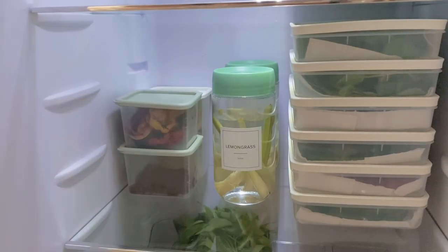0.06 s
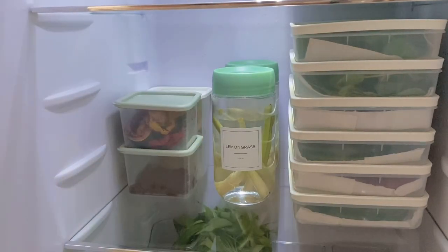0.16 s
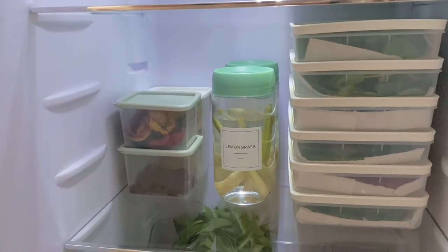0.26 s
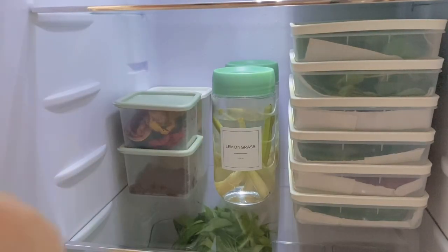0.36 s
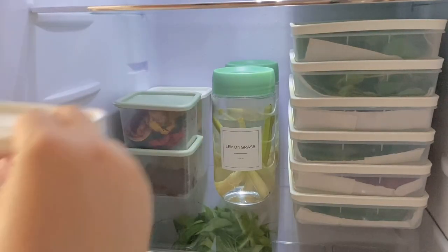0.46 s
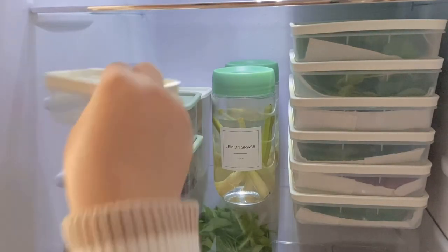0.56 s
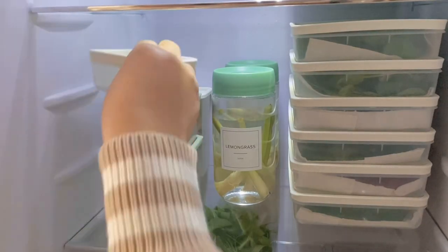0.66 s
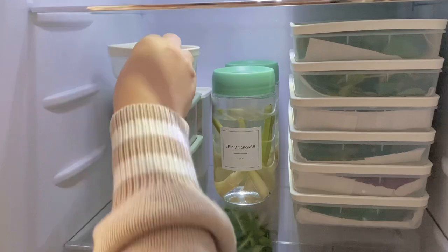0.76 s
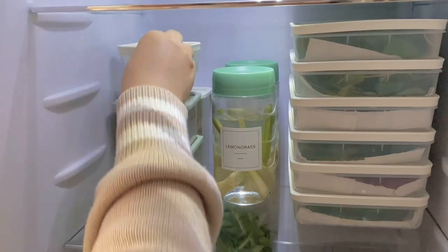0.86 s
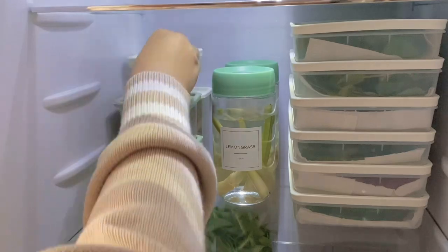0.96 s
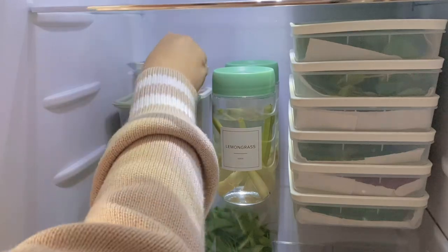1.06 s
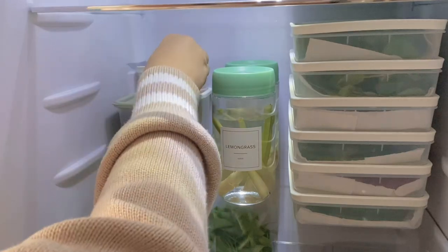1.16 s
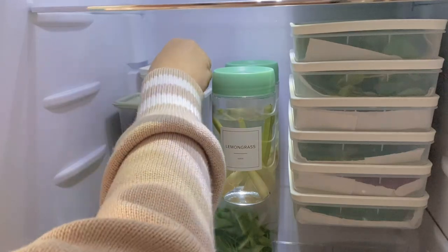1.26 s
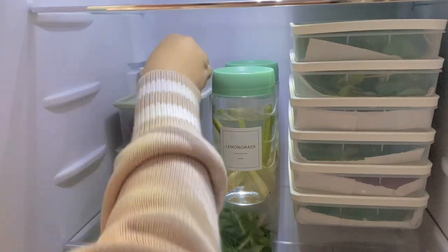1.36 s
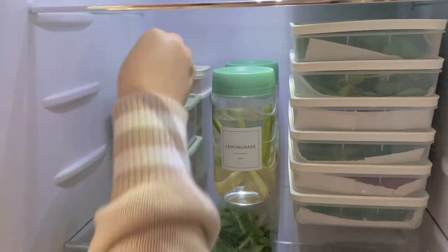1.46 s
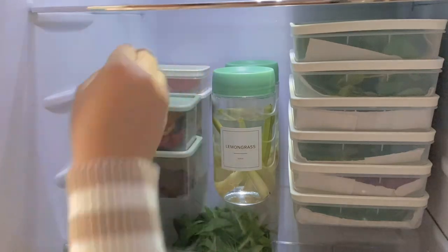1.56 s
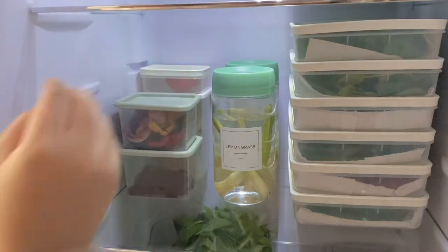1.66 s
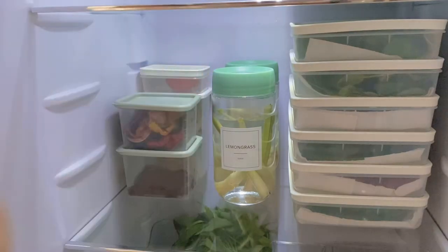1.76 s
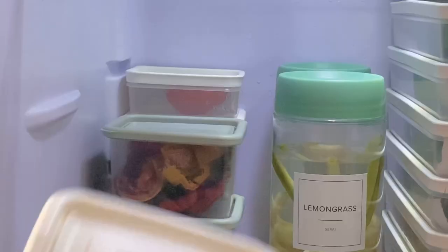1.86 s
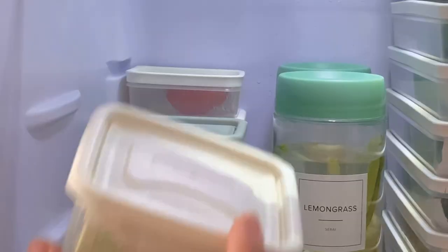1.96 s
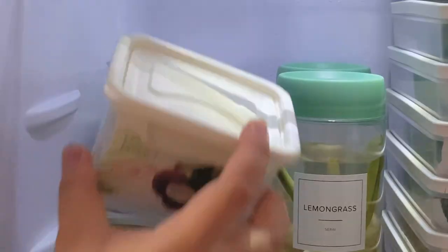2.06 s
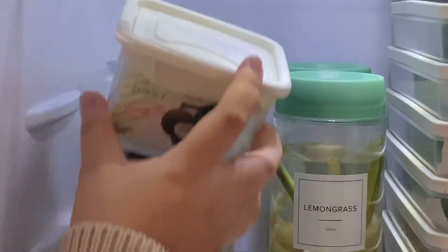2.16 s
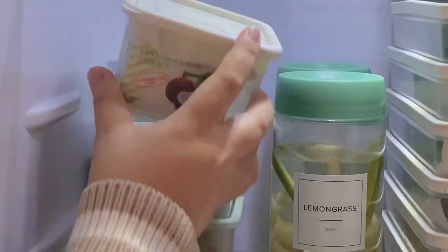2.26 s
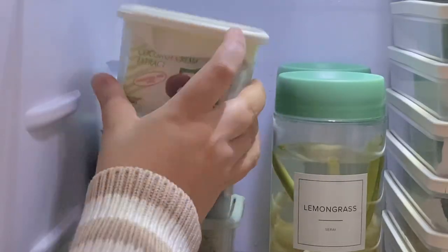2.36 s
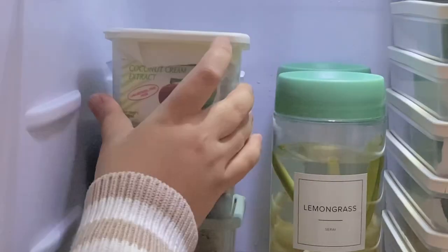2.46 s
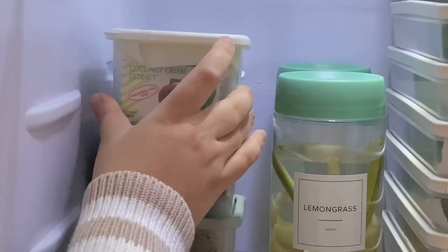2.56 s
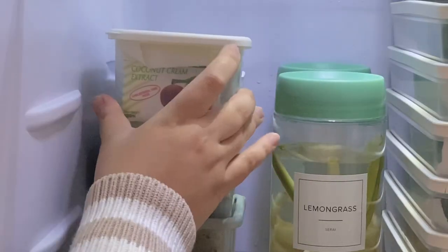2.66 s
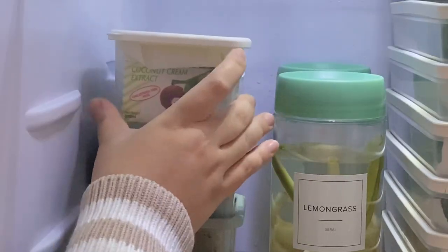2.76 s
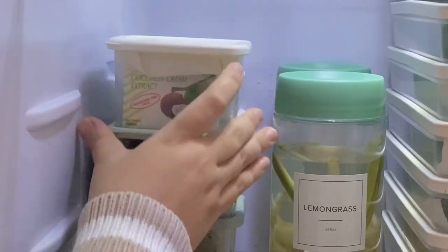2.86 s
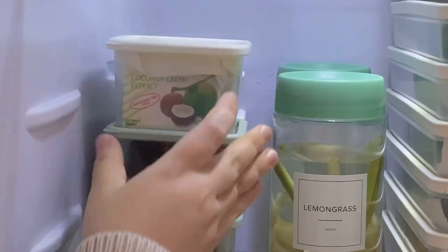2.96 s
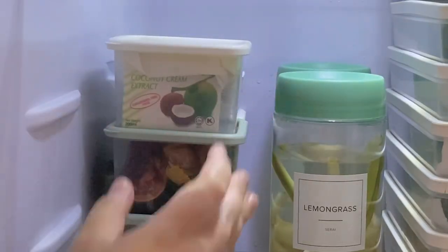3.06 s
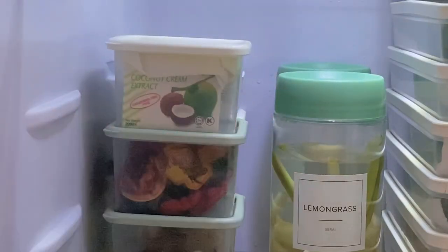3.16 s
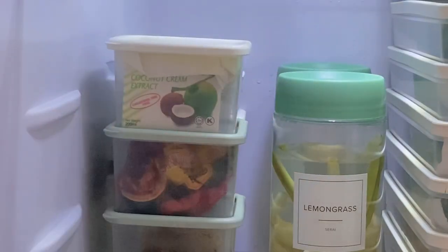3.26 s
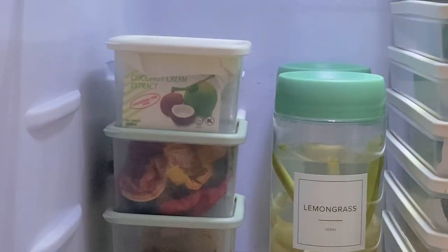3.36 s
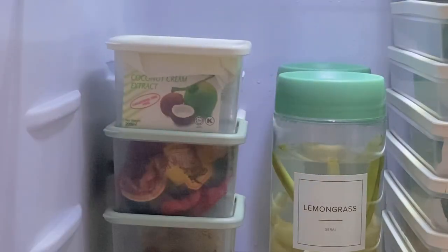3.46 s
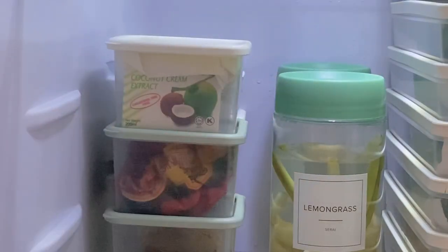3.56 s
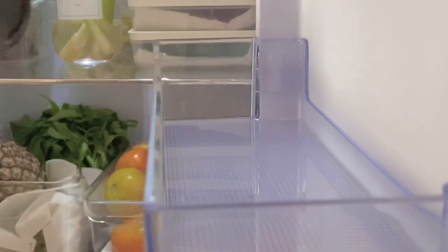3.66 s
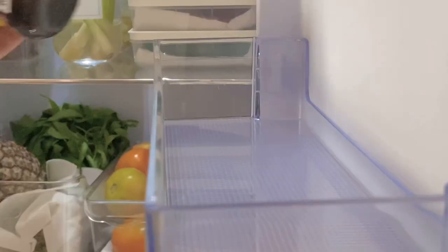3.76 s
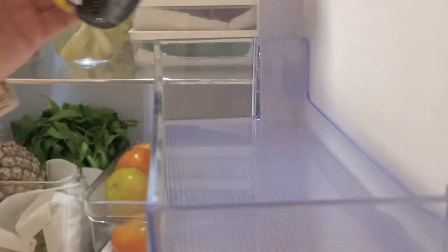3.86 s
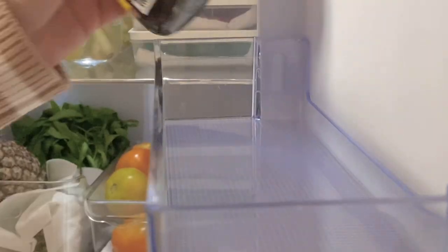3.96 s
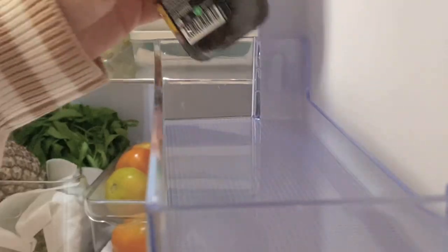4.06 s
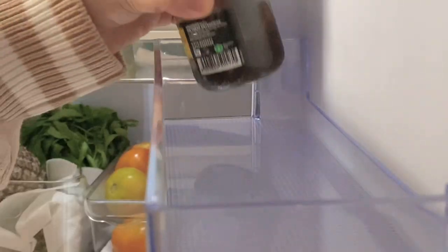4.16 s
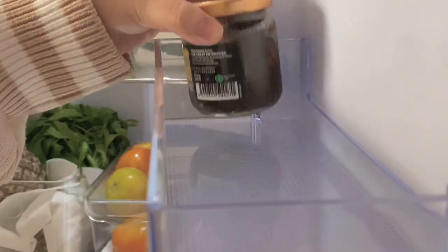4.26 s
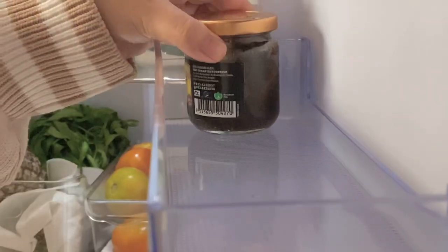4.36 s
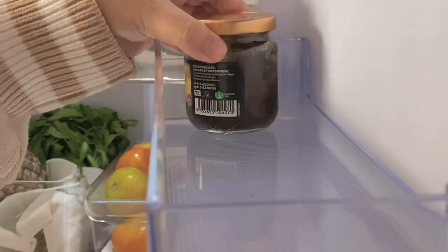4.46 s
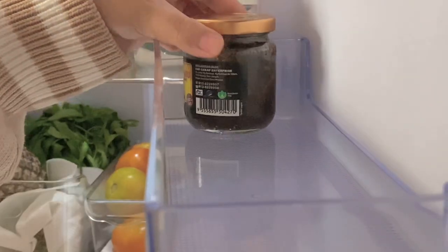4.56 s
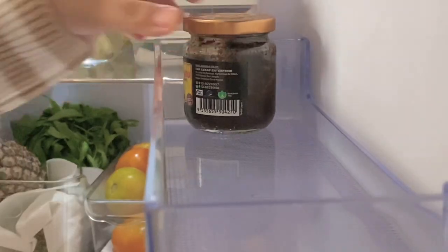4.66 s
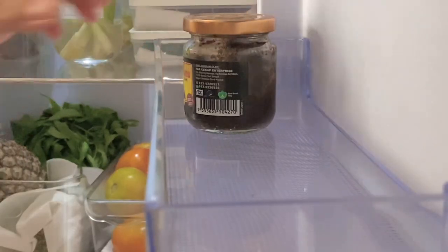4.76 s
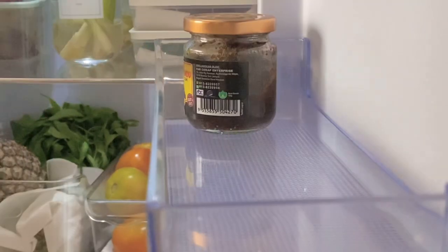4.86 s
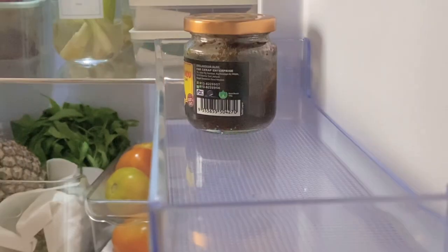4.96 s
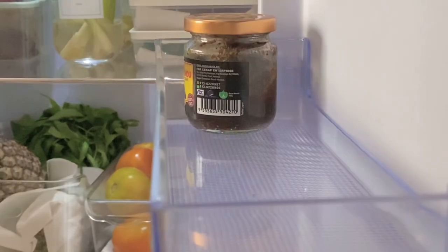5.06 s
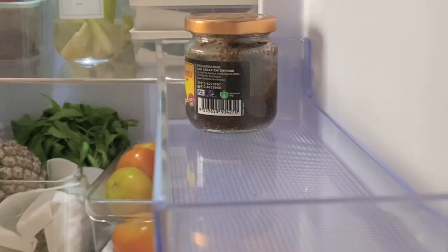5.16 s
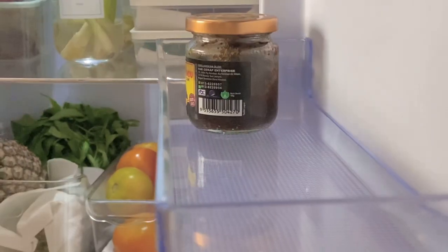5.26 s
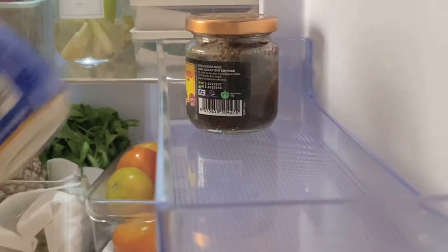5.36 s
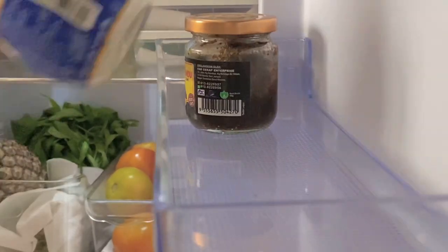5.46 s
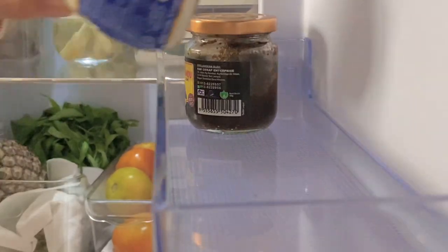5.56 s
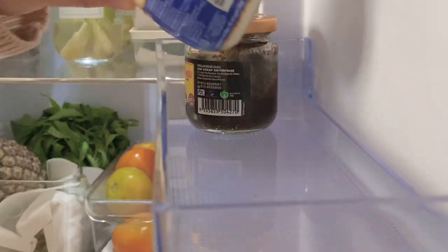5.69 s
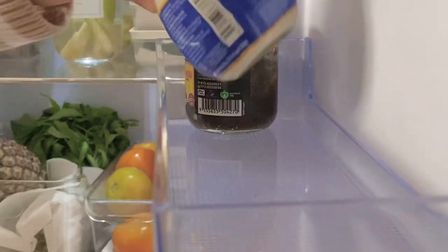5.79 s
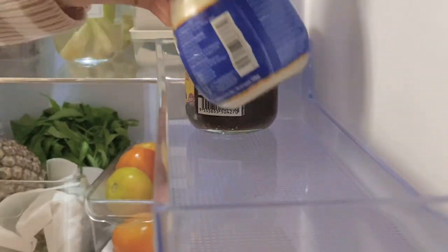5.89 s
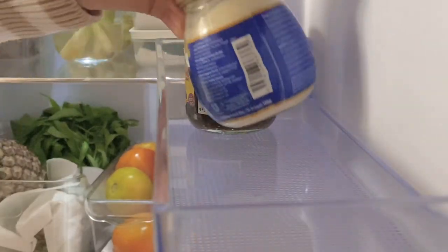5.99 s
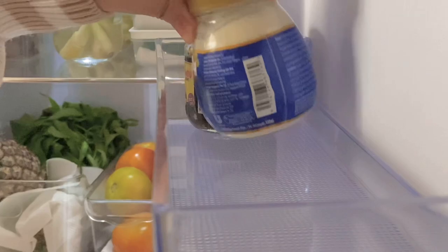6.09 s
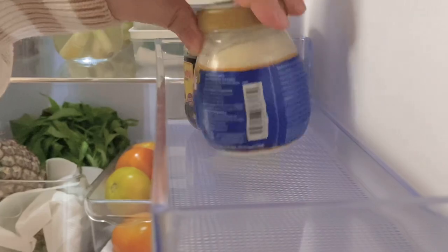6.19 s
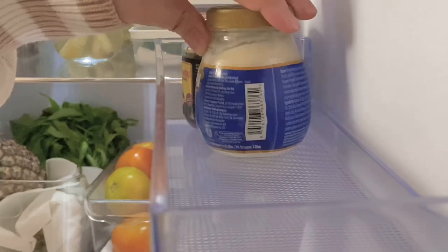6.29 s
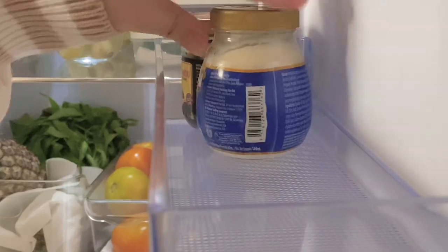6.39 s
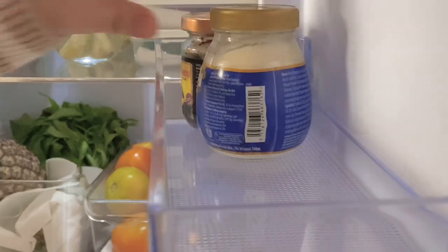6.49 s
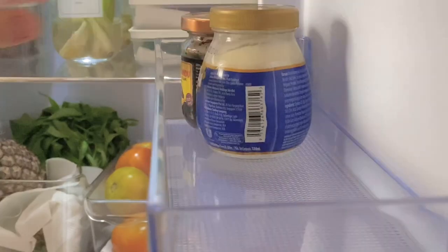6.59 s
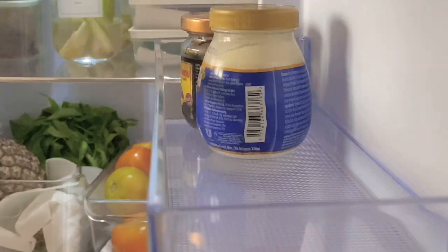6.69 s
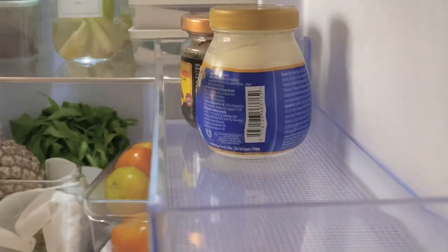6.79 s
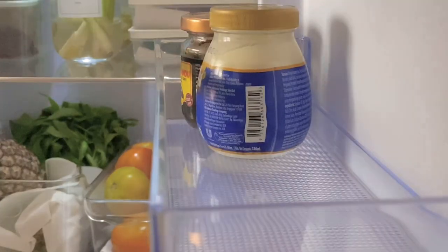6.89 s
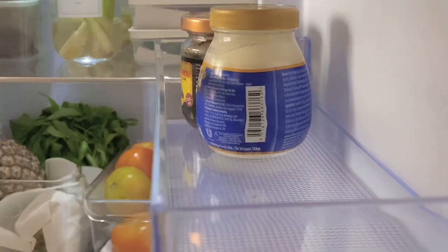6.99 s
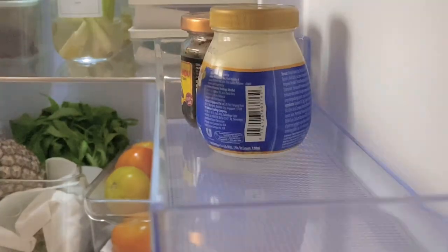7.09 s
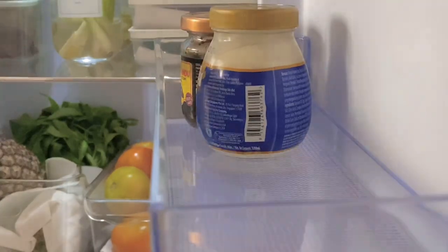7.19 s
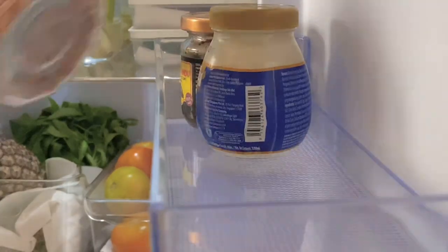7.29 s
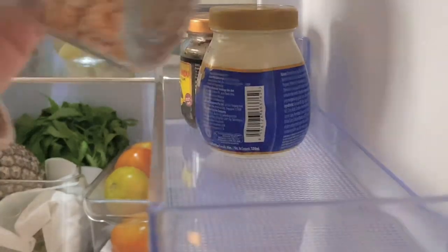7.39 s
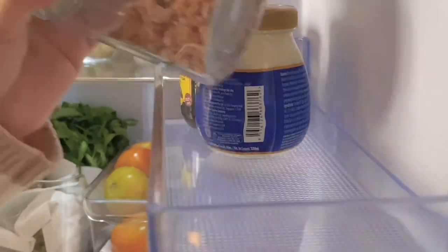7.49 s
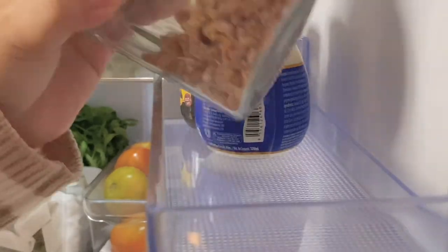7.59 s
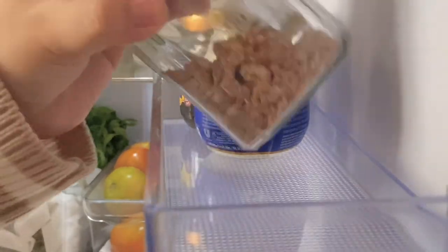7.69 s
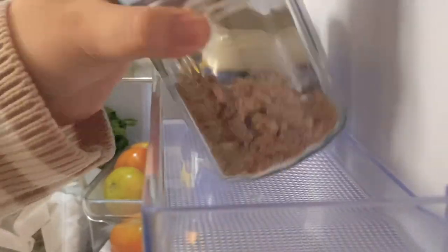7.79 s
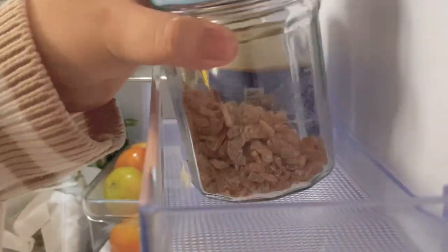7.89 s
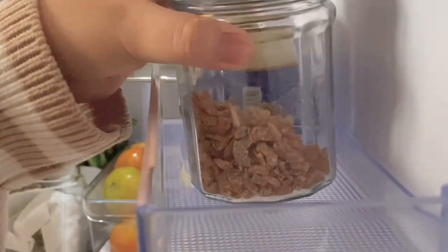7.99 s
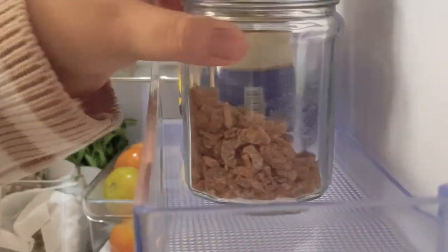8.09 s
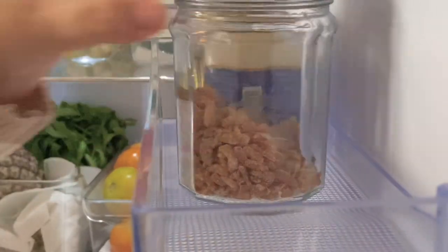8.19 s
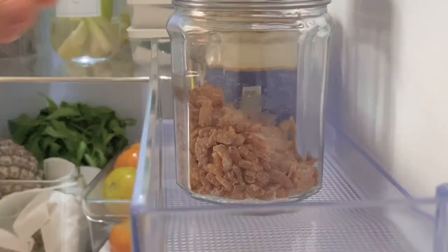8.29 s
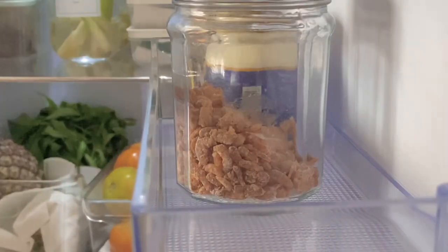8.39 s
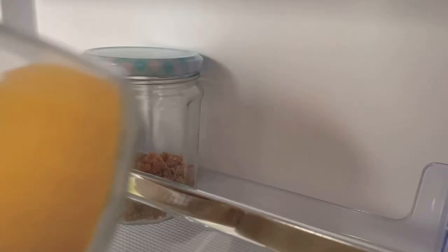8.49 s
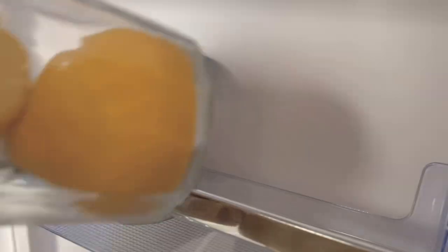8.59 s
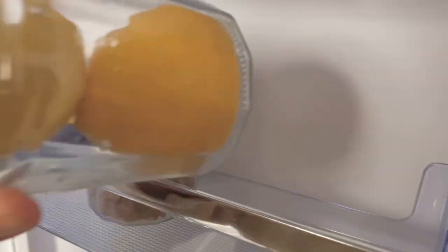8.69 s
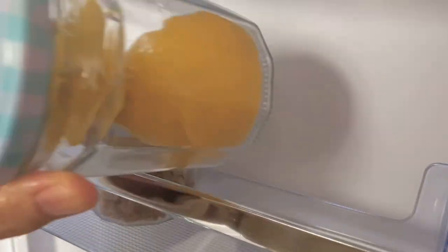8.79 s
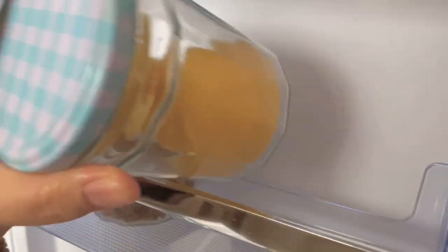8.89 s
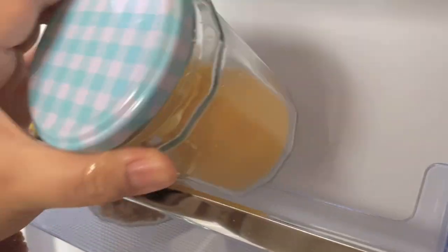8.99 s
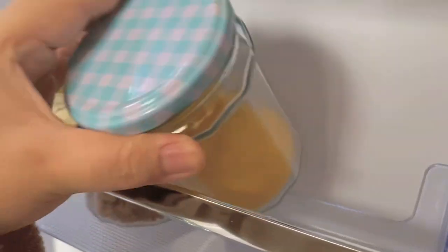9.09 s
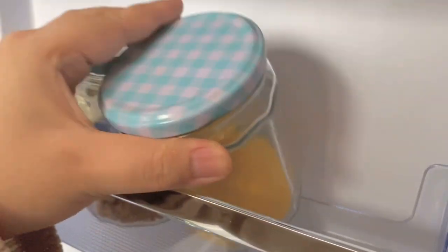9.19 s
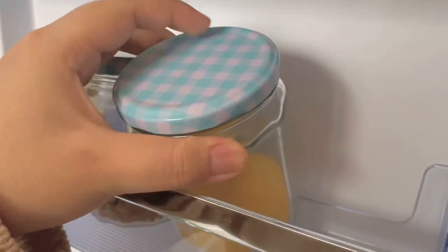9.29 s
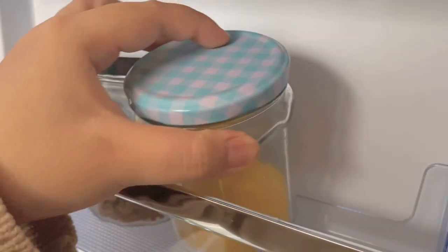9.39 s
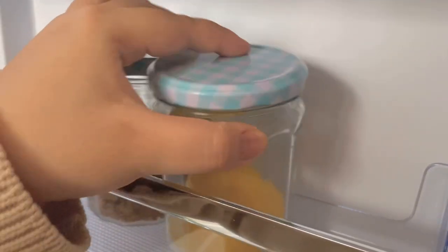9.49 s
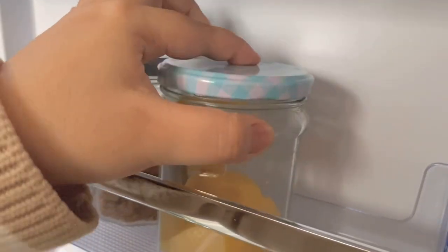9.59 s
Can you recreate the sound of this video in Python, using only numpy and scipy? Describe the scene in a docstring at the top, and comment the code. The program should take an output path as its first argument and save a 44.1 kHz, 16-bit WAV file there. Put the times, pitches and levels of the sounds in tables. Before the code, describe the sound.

Over a faint refrigerator hum, containers are stacked with hollow plastic knocks, followed by louder clunks of glass jars set in a door shelf.

```python
"""A kitchen, at the open refrigerator: plastic tubs are stacked inside, then jars are stood in the
plastic door tray. Every contact chatters briefly and rings the tub, tray or glass; some bases slide
a little, and fingers and a sleeve brush past. Cabinet and kitchen add a short tail.
Underneath, the compressor hums and rumbles, heard from four listening places in turn."""
import sys
import numpy as np
from scipy import signal
from scipy.fft import rfft, irfft, next_fast_len
from scipy.io import wavfile

SR = 44100
rng = np.random.default_rng(int(sys.argv[2]) if len(sys.argv) > 2 else 0)


def transcribe(u):
    """Save the signal u as a 16-bit wav file named by the first command-line argument.

    u: samples, shape (n,) or (channels, n), limited to [-1, 1]; the rate is SR.
    q: integer samples, one column per channel.
    """
    v = np.clip(np.atleast_2d(u).T, -1, 1)
    q = np.round(v * 32767).astype(np.int16)
    wavfile.write(sys.argv[1], SR, q)


N = 425124
T = np.arange(N) / SR

# Bounds of the four listening places: time_s
PLACE_BOUNDS_S = [0, 1.85, 3.648, 8.502, 9.698]
# Compressor rumble, one curve per place: freq_hz, density_db
RUMBLE_SPECTRA = [
    [(15, -35), (25, -11), (48, 4), (145, -2), (170, -6), (236, -4.5), (317, -2), (451, -15.5), (531, -15),
     (695, -19), (1100, -18.5), (1790, -29.5), (2280, -30), (16000, -65)],
    [(15, -38), (25, -21), (53, 5), (70, -19), (149, 7.5), (175, -10.5), (293, -1.5), (335, -10.5),
     (531, -10), (641, -14.5), (962, -15.5), (2280, -23), (2480, -26.5), (16000, -64.5)],
    [(15, -58.5), (25, -26), (45, -11.5), (92, -7.5), (153, -9.5), (190, -2), (217, -9.5), (439, -18),
     (531, -20.5), (641, -23), (1190, -30.5), (2280, -34), (3080, -47.5), (16000, -71.5)],
    [(15, -41), (25, -7), (53, 3), (120, -1), (200, 2.5), (394, -7), (463, -5), (591, -17), (754, -10),
     (2350, -25), (16000, -68.5)],
]
# Rumble at each place: level_db
RUMBLE_LEVELS_DB = [-52, -55, -53.5, -53.5]
# Stereo width of the rumble: freq_hz, side_over_mid_db
RUMBLE_WIDTH = [(60, -17.5), (150, -9.5), (380, -4.5), (950, 2), (2380, -7), (5980, -14), (15000, 1.5)]
# Motor tones: pitch_hz, then level_db at each of the four places
MOTOR_TONES = [(50, -85, -56, -69.5, -58), (98.1, -63, -58.5, -62, -62.5),
               (145.7, -72, -59.5, -67.5, -64.5), (198.2, -63.5, -62, -64.5, -62),
               (198, -82, -74.5, -62.5, -74), (235, -62, -68, -66, -80), (612, -80.5, -101, -71.5, -78),
               (660, -140, -91, -88, -92), (766, -81, -77.5, -79.5, -96), (1600, -117, -84, -87.5, -84),
               (1669, -85, -87, -86, -80), (2295, -99, -77.5, -89.5, -86), (2304, -84, -107.5, -82.5, -79)]

# Decay of cabinet and kitchen: freq_hz, t60_s
TAIL_DECAY = [(80, 0.67), (210, 0.47), (560, 0.34), (1470, 0.41), (3880, 0.28), (10200, .2)]
# Colour of that tail: freq_hz, gain_db
TAIL_EQ = [(80, 6), (400, 2), (1500, -0.5), (5000, -2.5), (14000, 3)]
# Part of the tail common to both sides: freq_hz, power_share
TAIL_CENTRE = [(100, 0.8), (500, 0.47), (1500, 0.17), (4000, 0.28), (9000, 0.31)]

# Brushes of fingers and sleeve: start_s, level_db
BRUSHES = [(0.287, -60), (0.303, -58), (1.422, -56.5), (3.947, -65), (5.056, -66), (5.389, -66.5),
           (5.726, -64), (7.229, -53), (7.294, -61.5), (7.541, -65.5)]
# Thin clicks: start_s, level_db
THIN_CLICKS = [(1.853, -45.5), (7.1387, -42.5)]
# Bases sliding after they land: start_s, length_s, level_db
BASE_SLIDES = [(0.962, 0.046, -54), (2.778, 0.076, -65), (4.463, 0.05, -76), (8.954, 0.27, -67),
               (9.242, 0.19, -67.5), (9.477, 0.12, -61)]

# Bounds of a hit's five bands (thud, knock, bite, edge, tick): freq_hz
BAND_EDGES_HZ = [70, 550, 1400, 2800, 6000, 13500]
# Decay of the wash, a body's countless weak modes dying as noise, per band: t60_s
WASH_T60_S = [0.11, 0.025, 0.018, 0.033, 0.06]
# Stereo width of the wash, per band: side_over_mid_db
WASH_WIDTH_DB = [-26.5, -1.5, -19, -4.5, -18]
# Strong modes of tub, door tray and jar: pitch_hz, level_db, t60_s
TUB_MODES = [(125, -4, .1), (180, -2, .08), (230, 0, .07), (300, -3, .05), (385, 0, .045), (440, 0, .04),
             (640, 0, .03), (850, -2, .025), (1250, -4, .025), (1600, -8, .02), (2100, -5, .025),
             (2860, 0, .025), (3830, -8, .015), (5260, -4, .015)]
TRAY_MODES = [(130, -6, .1), (190, 0, .09), (245, -2, .08), (320, -3, .06), (400, -1, .06), (505, 0, .05),
              (630, -1, .035), (760, -1, .03), (960, -2, .03), (1090, -1, .03), (1290, -2, .03),
              (1540, -2, .03), (1745, -3, .025), (2050, -3, .025), (2300, -4, .02), (2700, 0, .02),
              (3120, 0, .02), (3630, -3, .02), (4170, -4, .02), (4520, -4, .02), (5330, -6, .02),
              (6590, 0, .02)]
GLASS_MODES = [(250, -6, .07), (480, 0, .05), (700, -6, .04), (1017, 0, .04), (1110, -3, .04),
               (1599, -12, .03), (2560, 0, .035), (2720, -4, .045), (3214, -4, .025), (3709, -8, .025),
               (5060, -6, .04), (5250, -6, .04), (6400, -4, .025), (8330, -1, .04), (9600, -10, .025)]
# Hits on each body: start_s, knock_db, weight_db, hardness_db, thud_hz, knock_hz, pan_db, chatter_s
# Weight is thud over knock, hardness is bite over knock, pan is left over right.
TUB_HITS = [(0.09, -32, -5, -20, 370, 644, 2, 0.0097), (0.117, -21.5, -1, -24, 396, 660, -2, 0.0051),
            (0.164, -31, -0.5, -9, 102, 606, 0, 0.013), (0.204, -50.5, 2, -2.5, 334, 635, 8, 0.011),
            (0.943, -37.5, 21, 2, 225, 650, 16, 0.018), (0.987, -27.5, 18, 2, 385, 600, 9, 0.0074),
            (1.009, -28, 7, -1, 386, 654, 12, 0.0033), (1.062, -36, 9, -9.5, 127, 875, -1, .005),
            (1.071, -21.5, 6.5, -9.5, 198, 910, -1, 0.0075), (1.108, -20.5, 10.5, -1, 485, 600, 5, 0.0047),
            (1.139, -32, -8, -11, 390, 624, -8, 0.0087), (1.209, -36.5, 12, -4, 188, 600, 7, 0.0047),
            (1.228, -20.5, 2, -6, 380, 860, -2.5, 0.0038), (2.394, -19.5, 0, -1.5, 237, 603, -1, 0.0064),
            (2.418, -28.5, 11, -3.5, 120, 673, -2, 0.0043), (2.44, -27.5, 9.5, -9, 316, 622, 0, 0.0033),
            (2.52, -51, 12, -3.5, 116, 608, -.5, 0.01), (2.625, -45, 9, -23, 188, 680, 1, 0.0052),
            (2.718, -55, 13.5, -1, 102, 824, 1, 0.0067), (2.785, -47.5, 17.5, 7, 230, 600, 1, 0.016),
            (2.843, -20, 4.5, -16, 230, 610, 0.5, 0.0083)]
TRAY_HITS = [(4.356, -13, -3.5, -0.5, 544, 1390, 3.5, 0.01), (4.372, -21.5, 0, -1, 296, 633, -4, 0.015),
             (4.398, -24.5, 3, 0.5, 415, 670, -1, 0.015), (4.469, -38, 4, 1.5, 102, 633, -1.5, 0.011),
             (4.517, -26.5, 3.5, 0.5, 261, 1310, 4, 0.0088), (4.546, -24.5, 2, -11, 374, 700, 3, 0.0096),
             (6.198, -16.5, -3.5, -11.5, 345, 872, 5.5, .018),
             (6.216, -5, -11.5, -1.5, 519, 1350, .5, 0.0084), (6.239, -19, 7.5, -5.5, 509, 1100, 2, 0.013),
             (6.36, -33, -4, -7, 549, 928, -2, 0.017), (7.6, -17, -8, -18, 191, 800, 0.5, 0.013),
             (7.815, -4.5, -17.5, -7, 538, 1100, 3, 0.0028), (7.872, -11.5, -16, 3, 396, 1040, 2, 0.0042),
             (7.878, -4, -4.5, -4, 549, 700, -0.5, 0.0056), (7.9, -9, -10.5, -9.5, 202, 620, 1.5, 0.0095),
             (8.045, -29, -3, -5, 549, 600, 1, .02), (8.059, -15.5, -4.5, -1.5, 253, 630, -1, 0.031),
             (8.104, -10, -15, 0, 441, 745, -4, 0.0072), (8.111, -17, -20, -5.5, 252, 1180, 13, .016),
             (8.138, -10, -7.5, -1.5, 549, 1120, 0.5, .013), (8.179, -21, 0, -21, 210, 1083, -4, 0.0045),
             (8.91, -6, -7, -19, 549, 690, 3.5, 0.0066), (8.927, -23, -2, -18, 320, 940, 10, 0.0044),
             (9.225, -5.5, -2.5, -4.5, 474, 910, 3.5, 0.0045), (9.293, -26.5, 2.5, -5, 382, 600, 0, 0.0063),
             (9.504, -11.5, -3.5, -13.5, 164, 1080, -1.5, 0.0066),
             (9.531, -18.5, -2, -9.5, 517, 616, 9, .014), (9.559, -21.5, 0, -12.5, 474, 1000, 0, 0.04),
             (9.622, -7.5, -3.5, -4.5, 509, 605, 2, 0.012)]
GLASS_HITS = [(7.718, -50, 7, -11, 220, 885, 3.5, .006), (8.95, -8.5, -18, -12, 549, 970, 2.5, 0.0077),
              (8.961, -11, -9.5, -24, 549, 940, -3, 0.0015), (8.998, -15.5, -26, -14.5, 178, 830, 0, .005),
              (9.046, -40, -15, -6, 296, 1080, 1, 0.0068), (9.115, -33, -4.5, -17, 280, 1050, 0, 0.049),
              (9.205, -18.5, -6, -7.5, 495, 1060, 2.2, .018), (9.422, -19, -17, -9, 223, 1130, 0.5, 0.0019),
              (9.465, -19.5, -10, -12, 549, 1150, -4, 0.01), (9.485, -17, -5.5, -17, 393, 958, 8, 0.036)]

# Phase of the left microphone port against the right: freq_hz, lead_rad
PORT_PHASE = [(100, 0), (400, .3), (860, .5), (1460, -.3), (3270, .5), (7400, -.3), (8500, -3.14),
              (9560, -5.8), (10700, -6.5), (12100, -9.42), (13400, -12.2), (16100, -15.7)]


def from_db(db):
    """Decibels to gain."""
    return 10 ** (np.asarray(db) / 20)


def peak_one(x):
    """Normalise to a peak of 1."""
    return x / (np.abs(x).max() + 1e-20)


def at_hz(points, hz):
    """Read a curve on a log-frequency axis."""
    p = np.array(points)
    return np.interp(np.log(np.maximum(hz, 1)), np.log(np.maximum(p[:, 0], 1)), p[:, 1])


def band(x, low_hz, high_hz):
    """Gentle band-pass."""
    return signal.sosfilt(signal.butter(2, [low_hz, high_hz], "band", fs=SR, output="sos"), x)


def panned(x, pan_db):
    """Stereo, with the left louder by pan_db."""
    return from_db([[pan_db / 2], [-pan_db / 2]]) * x


def add(out, x, start_s):
    """Drop a stereo sound onto the timeline."""
    i = round(start_s * SR)
    out[:, i:i + x.shape[1]] += x[:, :N - i]


def chatter(t, length_s, per_s, first_db, rattle_db, rise_s):
    """Force of a landing: first touch, micro-contacts as it settles, a faint rattle of neighbours."""
    impulses = (rng.random(len(t)) < per_s / SR) * rng.standard_normal(len(t))
    settling = np.exp(-t / length_s) + from_db(rattle_db) * np.exp(-t / 0.057)
    fade_out = np.cos(np.pi / 2 * t / t[-1])
    loading = 1 - np.exp(-t / rise_s)   # the weight comes on gradually
    force = impulses * settling * fade_out * loading
    force /= np.sqrt((force ** 2).sum() + 1e-12)
    force[0] = from_db(first_db)
    return force


def compressor():
    """The bed: rumble, fan noise and wavering motor tones, balanced anew at each listening place."""
    crossfades = np.array([np.clip((T - s) / 0.0092 + 1, 0, 1) for s in PLACE_BOUNDS_S])
    place_gates = crossfades[:-1] - crossfades[1:]
    size, out = next_fast_len(N), 0
    hz = np.arange(size // 2 + 1) * SR / size
    noise = rfft(rng.standard_normal((2, size))) * from_db([0 * hz, at_hz(RUMBLE_WIDTH, hz)])
    for gate, spectrum, level_db in zip(place_gates, RUMBLE_SPECTRA, RUMBLE_LEVELS_DB):
        mid, side = irfft(noise * from_db(at_hz(spectrum, hz)), size)[:, :N]
        out += gate * from_db(level_db) / mid.std() * (mid + side * [[1], [-1]])
    for pitch_hz, *levels_db in MOTOR_TONES:
        drift = np.interp(T, T[::441], np.cumsum(rng.normal(0, .12, len(T[::441]))))
        phase = 2 * np.pi * pitch_hz * T + rng.uniform(0, 2 * np.pi) + drift
        out += np.sqrt(2) * (from_db(levels_db) @ place_gates) * np.sin(phase)
    return panned(out, pan_db=-1.5)


def cabinet_tail(x):
    """Reflections of cabinet and kitchen: noise that blooms quickly and dies sooner in the treble."""
    t, response = T[:SR // 2], 0
    edges_hz = 60 * 2 ** np.arange(0, 8.1, .5)
    for low, high in zip(edges_hz, edges_hz[1:]):
        centre, left, right = band(rng.standard_normal((3, len(t))), low, high)
        share = at_hz(TAIL_CENTRE, low)
        stereo = np.sqrt(share) * centre + np.sqrt(1 - share) * np.array([left, right])
        response += stereo * from_db(at_hz(TAIL_EQ, low) - 60 * t / at_hz(TAIL_DECAY, low))
    response *= 1 - np.exp(-t / 0.002)
    response /= np.sqrt((response ** 2).sum() / 2)
    return signal.fftconvolve(x, response, axes=1)[:, :N]


def brushes():
    """Fingers and sleeve graze a surface: dense micro-contacts make a faint, bright rustle."""
    out, t = np.zeros((2, N)), T[:SR // 10]
    for start_s, level_db in BRUSHES:
        force = chatter(t, length_s=0.022, per_s=13000, first_db=-7.5, rattle_db=-30, rise_s=0.0014)
        rustle = peak_one(band(force, 1600, 14700))
        add(out, panned(from_db(level_db) * rustle, 0), start_s)
    return out


def thin_clicks():
    """Two thin clicks in the centre, each a single band-passed impulse."""
    out = np.zeros((2, N))
    click = peak_one(band(signal.unit_impulse(SR // 10), 1200, 12500))
    for start_s, level_db in THIN_CLICKS:
        add(out, panned(from_db(level_db) * click, 0), start_s)
    return out


def slides(grains_per_s=1700):
    """A base skids after landing: fine, uneven friction grains that start at once and fade."""
    out, t = np.zeros((2, N)), T[:SR // 4]
    for start_s, length_s, level_db in BASE_SLIDES:
        grains = (rng.random(len(t)) < grains_per_s / SR) * rng.standard_normal(len(t))
        rub = band(grains, 2500, 10500)
        stroke = np.sqrt(np.clip(1 - t / length_s, 0, 1)) * np.minimum(t / 0.005, 1)
        add(out, panned(from_db(level_db) * stroke * rub / rub.std(), 0), start_s)
    return out


def mode_wash(force, k):
    """The weak modes of band k store the energy of every micro-contact and let it die as noise."""
    retained = from_db(-120 / WASH_T60_S[k] / SR)   # energy left after one sample
    energy = signal.lfilter([1], [1, -retained], force ** 2)
    noise = rng.standard_normal((2, len(force))) * np.sqrt(energy)
    mid, side = band(noise, *BAND_EDGES_HZ[k:k + 2])
    return peak_one(mid + from_db(WASH_WIDTH_DB[k]) * side * [[1], [-1]])


def struck_body(hits, modes, wash_db, edge_db, tick_db, spread_db, reach_octaves, **landing):
    """Each hit chatters into a body's modes; the struck spot favours those near its thud and knock."""
    out, t = np.zeros((2, N)), T[:SR // 7]
    hz, mode_db, t60_s = np.transpose(modes)[:, :, None]
    rings = from_db(mode_db - 60 * t / t60_s) * np.sin(2 * np.pi * hz * t)
    mode_band = np.searchsorted(BAND_EDGES_HZ, hz[:, 0]) - 1
    in_band = mode_band == np.arange(5)[:, None]
    selectivity = np.choose(mode_band, [1, 1, .4, .16, .09])   # high modes care less about the spot
    # Plastic gives a little: each band starts without a click above its range.
    soften = [signal.butter(2, min(1.76 * top, .45 * SR), fs=SR, output="sos")
              for top in BAND_EDGES_HZ[1:]]
    for start_s, knock_db, weight_db, hardness_db, thud_hz, knock_hz, pan_db, chatter_s in hits:
        force = chatter(t, chatter_s, per_s=1500, **landing)
        distance = np.log2(hz[:, 0] / np.where(mode_band == 0, thud_hz, knock_hz)) * selectivity
        drive = from_db(spread_db * rng.standard_normal(len(modes))) * rng.choice([-1, 1], len(modes))
        drive /= 1 + (distance / reach_octaves) ** 2
        ringing = signal.fftconvolve(force[None], (drive * in_band) @ rings, axes=1)[:, :len(t)]
        # Edge and tick ride on the bite, so a harder hit is brighter all the way up.
        balance_db = [weight_db, 0, hardness_db, hardness_db + edge_db, hardness_db + tick_db]
        pans_db = [-2.5, pan_db, pan_db / 2, 0, 0]
        for k in range(5):
            layer = peak_one(ringing[k]) + from_db(wash_db[k]) * mode_wash(force, k)
            layer = peak_one(signal.sosfilt(soften[k], layer))
            add(out, panned(from_db(knock_db + balance_db[k]) * layer, pans_db[k]), start_s)
    return out


def tubs():
    """Plastic tubs land on one another with a soft attack and a hollow knock."""
    return struck_body(TUB_HITS, TUB_MODES, wash_db=[-9.5, 0, 4.5, 2, 7],
                       edge_db=-4.5, tick_db=-24.5, spread_db=3, reach_octaves=0.38,
                       first_db=-4.5, rattle_db=-33, rise_s=0.0016)


def door_tray():
    """Jars land in the plastic door tray and set it clattering with a hard attack."""
    return struck_body(TRAY_HITS, TRAY_MODES, wash_db=[-5, -0.5, 4.5, 8.5, 5],
                       edge_db=-7, tick_db=-19.5, spread_db=4.5, reach_octaves=0.38,
                       first_db=-4.5, rattle_db=-27, rise_s=0.00057)


def jar_clinks():
    """A sharp first touch rings the glass of a jar, short and bright."""
    return struck_body(GLASS_HITS, GLASS_MODES, wash_db=[2.5, -1.5, -3.5, 0, -15],
                       edge_db=-3, tick_db=-7, spread_db=1, reach_octaves=1,
                       first_db=0.5, rattle_db=-30.5, rise_s=0.0009)


def scene():
    """Knocks, clinks, brushes and slides, plus two thin clicks, with their tail over the compressor."""
    close = tubs() + door_tray() + jar_clinks() + brushes() + thin_clicks() + slides()
    # Small bodies radiate no deep bass.
    close = signal.sosfilt(signal.butter(3, 85, "high", fs=SR, output="sos"), close)
    return close + from_db(-14) * cabinet_tail(close) + compressor()


def record(dry):
    """The left microphone port lags in the treble; sub-bass and top are cut, and peaks are rounded."""
    size = next_fast_len(N + 2048)
    lead_rad = at_hz(PORT_PHASE, np.arange(size // 2 + 1) * SR / size)
    left = irfft(rfft(dry[0], size) * np.exp(1j * lead_rad), size)[:N]
    stereo = signal.sosfilt(signal.butter(4, 44, "high", fs=SR, output="sos"), [left, dry[1]])
    rounded = stereo / (1 + np.abs(stereo / .93) ** 6) ** (1 / 6)
    return signal.sosfilt(signal.cheby2(20, 80, 16600, fs=SR, output="sos"), rounded)


dry = scene()
out = record(dry)
transcribe(out)
```